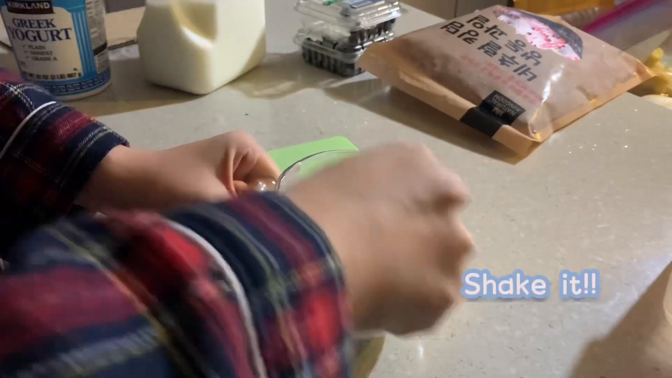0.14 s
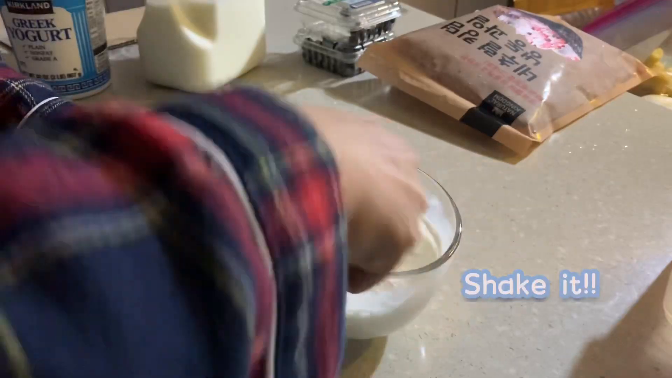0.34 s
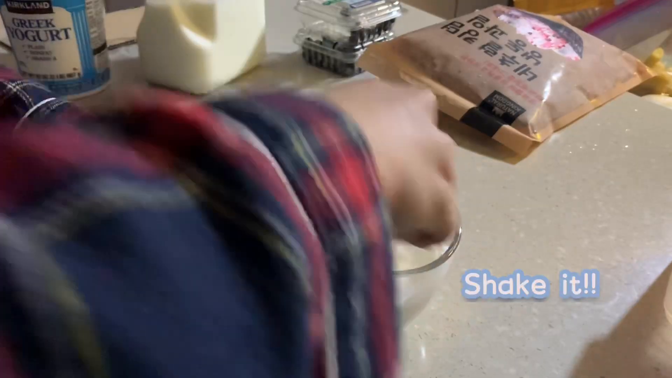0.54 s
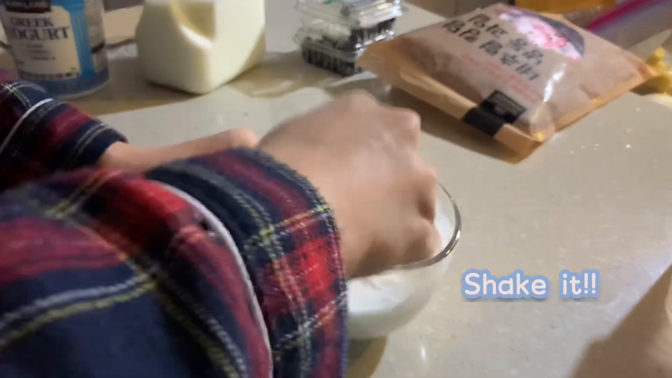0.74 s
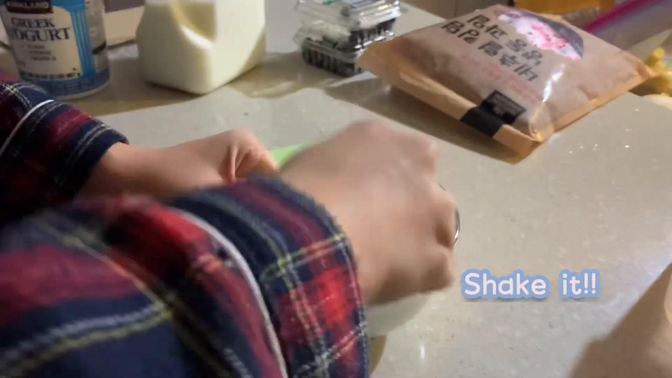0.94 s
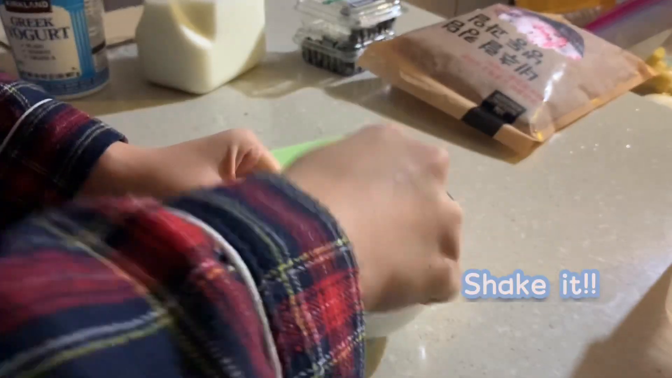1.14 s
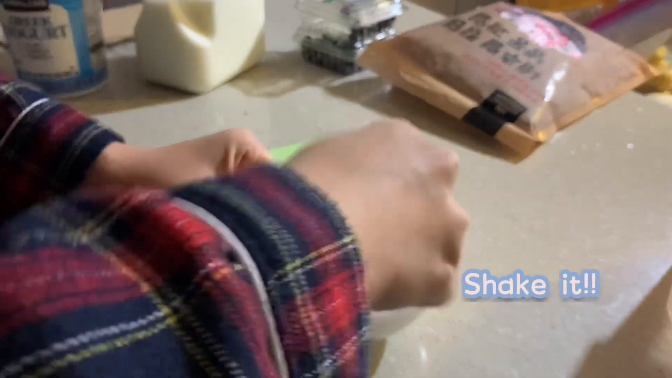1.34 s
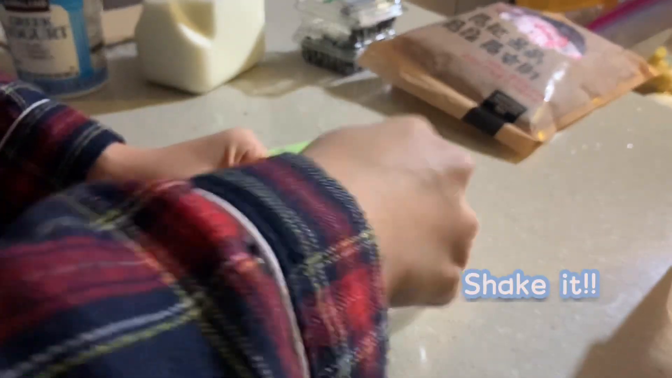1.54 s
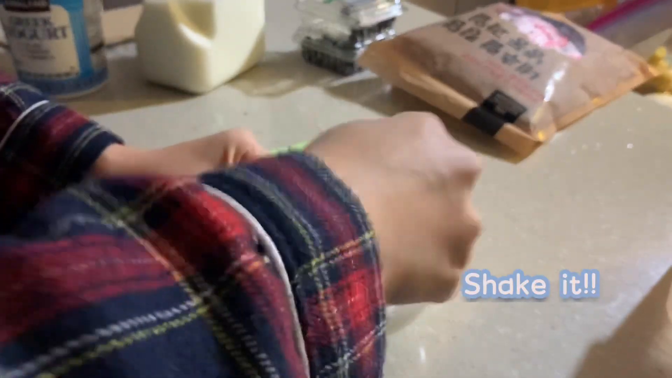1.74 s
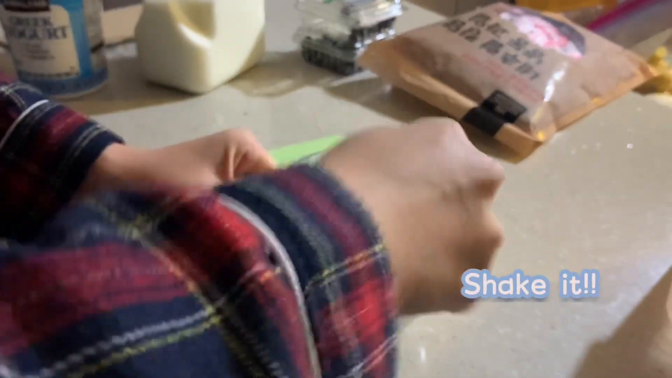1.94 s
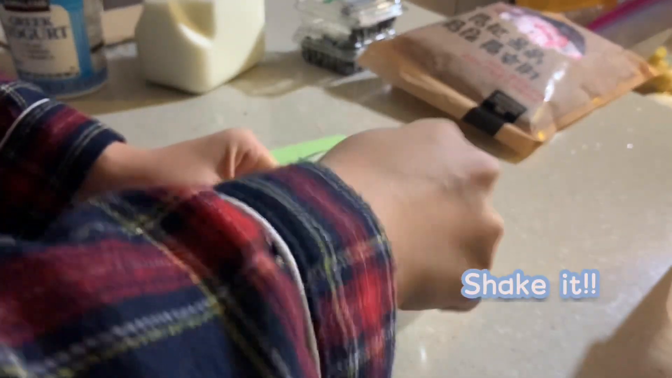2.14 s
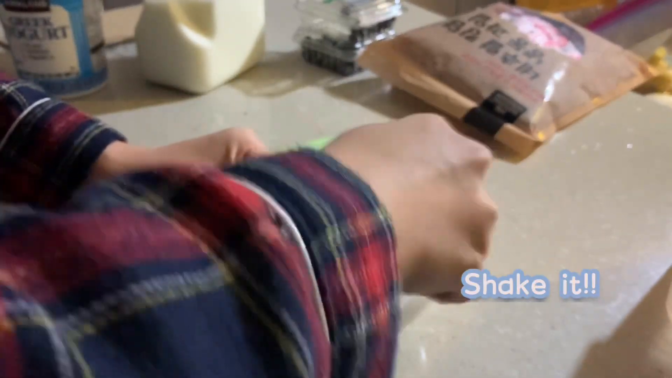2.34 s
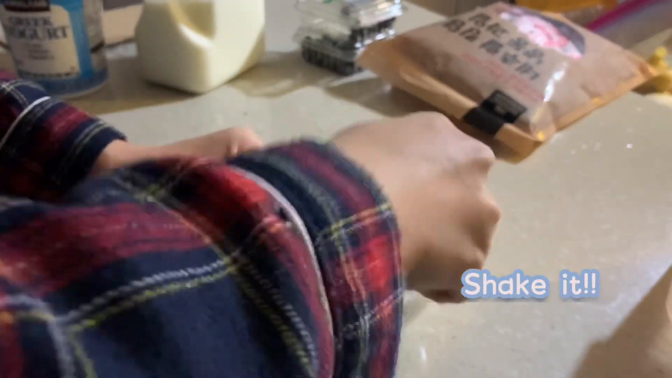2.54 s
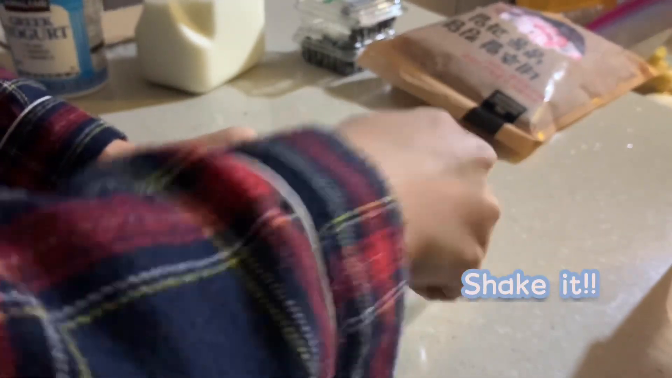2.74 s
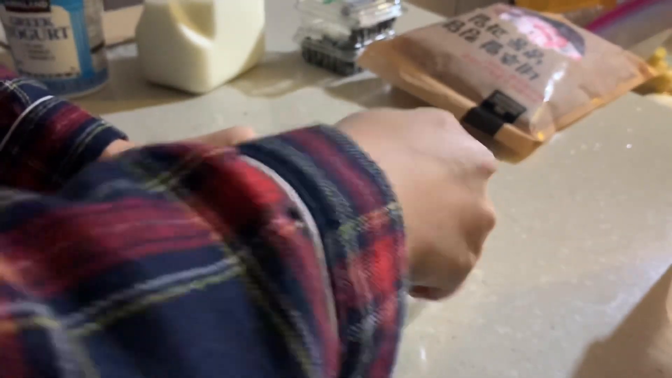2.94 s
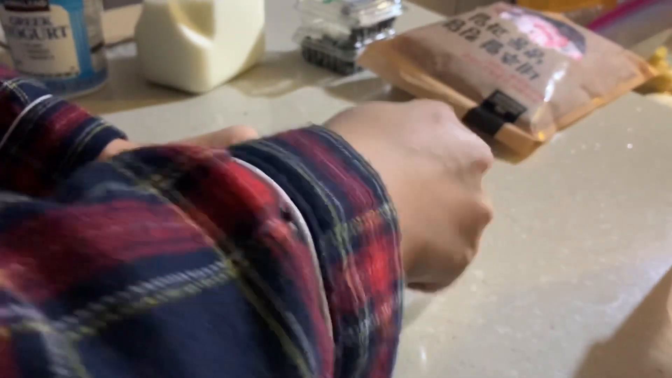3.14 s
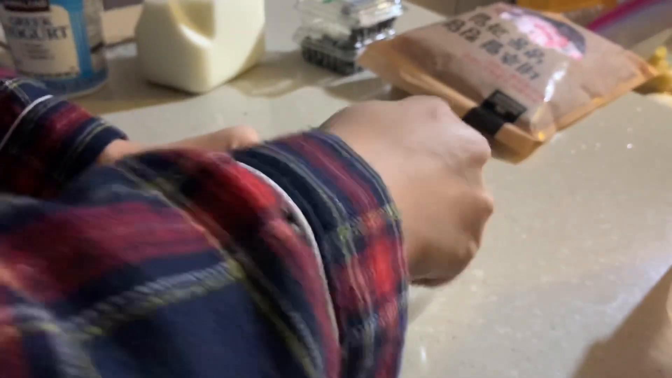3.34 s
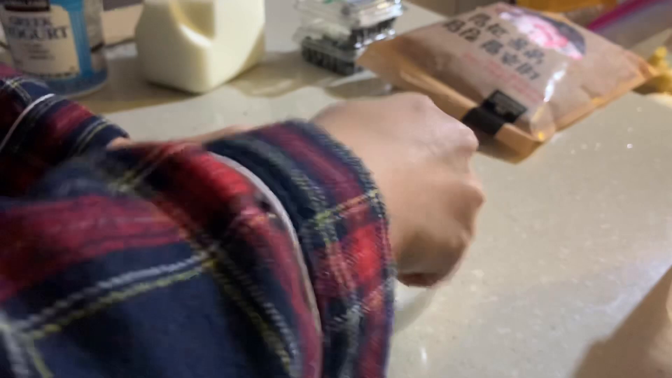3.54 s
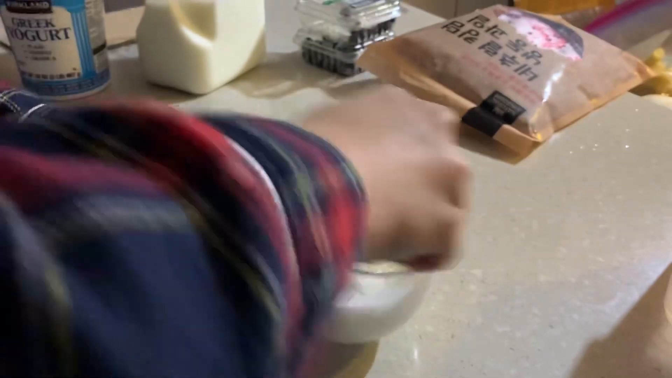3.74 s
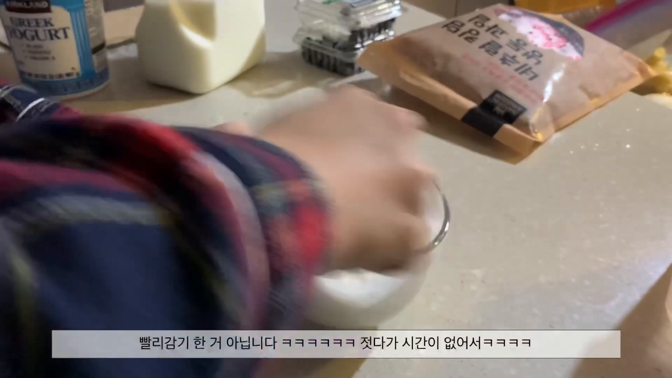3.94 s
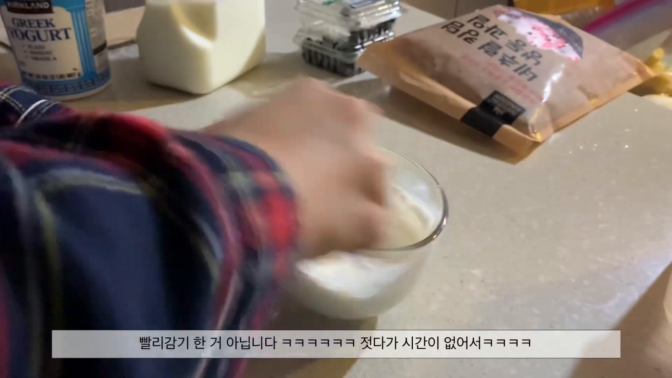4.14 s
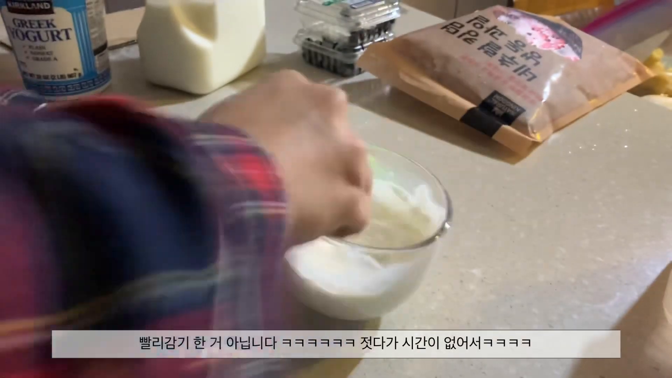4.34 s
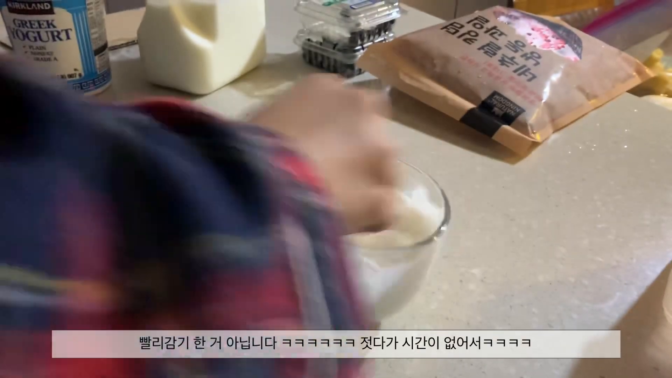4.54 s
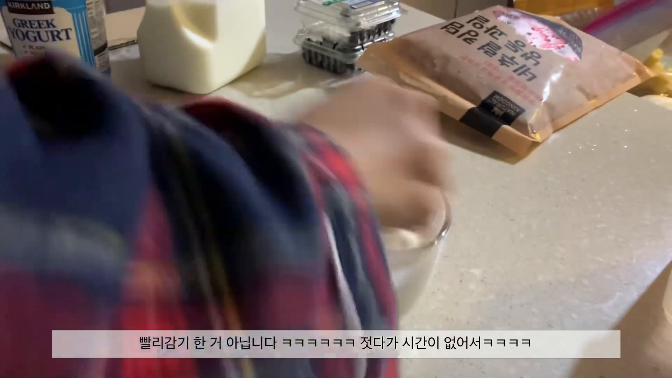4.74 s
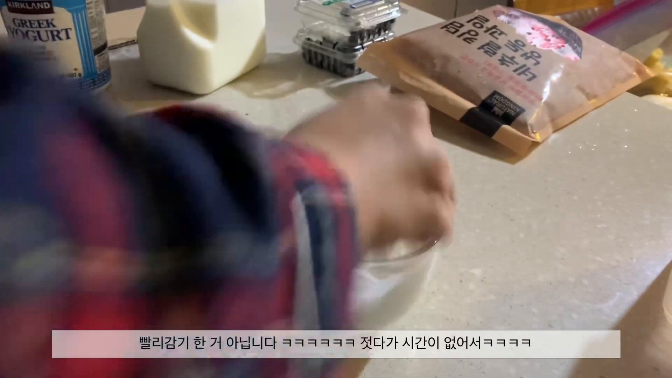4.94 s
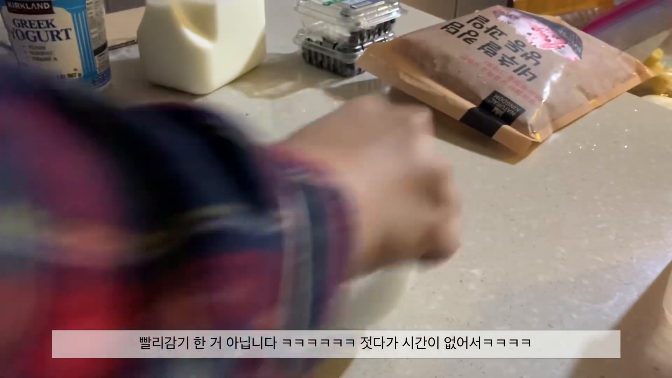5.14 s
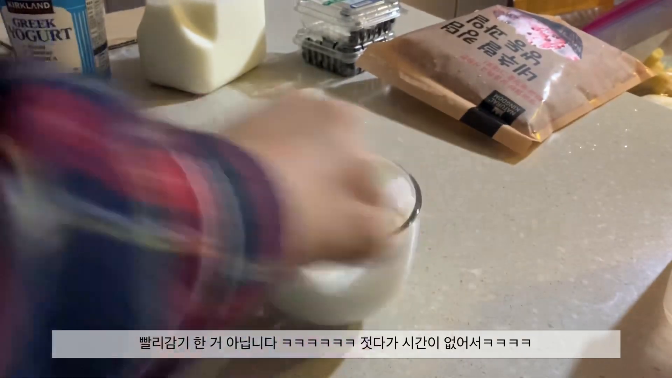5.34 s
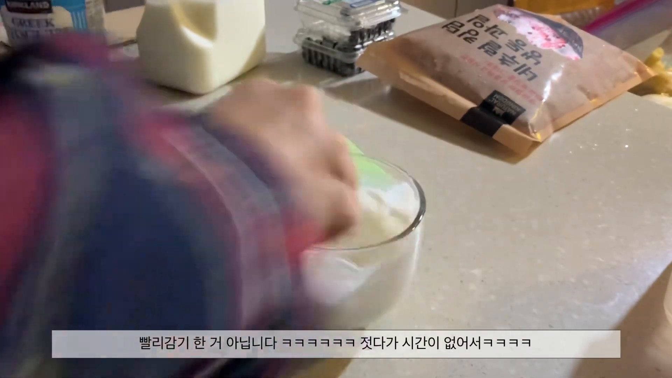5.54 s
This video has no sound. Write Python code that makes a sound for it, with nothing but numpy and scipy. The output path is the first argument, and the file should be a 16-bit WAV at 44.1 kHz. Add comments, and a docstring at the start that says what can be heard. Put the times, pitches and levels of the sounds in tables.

```python
"""Beating yogurt in a glass mug

A spoon beats thick yogurt and milk on a kitchen counter, about five turns a second. Each turn knocks
the wall of the mug, whose ring the filling damps to a short clink, and thumps the counter. Later the
spoon digs deeper and air pockets plop and squelch. A faint hum fills the small, echoing room."""
import sys
import numpy as np
from scipy import signal
from scipy.io import wavfile

SR = 44100
rng = np.random.default_rng(int(sys.argv[2]) if len(sys.argv) > 2 else 0)


def int16_out(signal):
    """Quantize to a 16-bit WAV file."""
    q = np.round(np.clip(np.atleast_2d(signal).T, -1, 1) * 32767)
    wavfile.write(sys.argv[1], SR, q.astype(np.int16))


N = 251370


def from_db(db):
    """Turn decibels into a gain."""
    return 10 ** (np.asarray(db) / 20)

def rms_one(x):
    """Scale to an average power of one."""
    return x / np.sqrt(np.mean(x ** 2) + 1e-20)

def peak_one(x):
    """Scale to a peak of one."""
    return x / np.abs(x).max()

def seconds(length):
    """The time of each sample."""
    return np.arange(int(length * SR)) / SR

def panned(db):
    """Left and right gains; positive is louder on the left."""
    return from_db(np.array([[.5], [-.5]]) * db)

def spaced(sound, lag_s):
    """The sound reaches the right side later than the left (earlier if negative)."""
    left, right = np.broadcast_to(sound, (2, sound.shape[-1]))
    i = np.arange(len(left))
    return np.array([np.interp(i - max(-lag_s, 0) * SR, i, left, left=0),
                     np.interp(i - max(lag_s, 0) * SR, i, right, left=0)])

def cut(x, hz, kind, order=2):
    """Keep the lows, the highs or a band."""
    sos = signal.butter(order, np.clip(hz, 10, .45 * SR), kind, fs=SR, output="sos")
    return signal.sosfilt(sos, x + 1e-18)

def add(track, s, sound):
    """Mix a sound in at s seconds."""
    i = max(round(s * SR), 0)
    track[:, i:i + sound.shape[-1]] += sound[..., :N - i]

def at_hz(table, hz, column=1):
    """Read a table between its listed frequencies."""
    table = np.array(table)
    return np.interp(np.log(hz), np.log(table[:, 0]), table[:, column])

def noise_bands(size, alike_hz):
    """Half-octave bands of stereo noise; the two sides agree in the bass."""
    edges = 22 * 2 ** np.arange(0, 10, .5)
    white = rng.standard_normal((2, 2, size))
    for k, (low, high) in enumerate(zip(edges, edges[1:])):
        hz = np.sqrt(low * high)
        mid, side = cut(white[k % 2], [low, high], "band")
        alike = 1 / (1 + (hz / alike_hz) ** 2)
        yield hz, np.sqrt((1 + alike) / 2) * mid + np.sqrt((1 - alike) / 2) * side * [[1], [-1]]

def depth(s, dig_s=3.612, ramp_s=0.13):
    """How deep the spoon works: 0 high on the wall, 1 at the bottom."""
    return np.clip((s - dig_s) / ramp_s, 0, 1)

# tone of the room's air: f/Hz, relative level/dB
AIR_TONE = [(18, -44), (30, 0.5), (75, -5.5), (154, -6), (240, -23), (1000, -32), (1270, -34.5),
            (1730, -50), (2490, -45), (7240, -57), (9390, -63.5), (15000, -60.5)]
def room_air(bands):
    """The air makes a soft rumble with a trace of hiss."""
    return from_db(-60.5) * rms_one(sum(from_db(at_hz(AIR_TONE, hz)) * band for hz, band in bands))

# tone of rustling flannel: f/Hz, relative level/dB
SLEEVE_TONE = [(100, -29.5), (2500, 0.5), (7000, -5), (9300, 0.5), (11700, -5), (14000, -5.5)]
def sleeve(bands):
    """The sleeve rustles with the arm, more once the spoon digs down."""
    rustle = rms_one(sum(from_db(at_hz(SLEEVE_TONE, hz)) * band[:, ::-1] for hz, band in bands))
    return from_db(-84 + 6 * depth(np.arange(N) / SR)) * rustle

def background(hum_hz=63.8):
    """Room air, the low hum of an appliance and the sleeve."""
    bands = list(noise_bands(N, alike_hz=613))
    hum = from_db(-56) * np.sqrt(2) * np.sin(2 * np.pi * hum_hz * np.arange(N) / SR)
    return panned(-3.3) * (room_air(bands) + hum) + sleeve(bands)

# the kitchen's lingering sound: f/Hz, level/dB, time to fade by 60 dB/s
ROOM_TAIL = [(58.3, -2.5, 0.98), (200, -8, 0.4), (356, 4.5, 0.17), (704, -2, 0.43), (1400, -8, 0.54),
             (2270, -4.5, 0.47), (4380, -5, 0.45), (8460, -9.5, 0.15), (15000, -25, 0.22)]
# bounces off nearby surfaces: delay/s, gain, side (0 left, 1 right)
NEAR_ECHOES = [(0.003263, 0.56, 0), (0.0098, 0.045, 0), (0.00305, 0.29, 1), (0.008, 0.38, 1)]
def kitchen_response():
    """Things on the counter bounce the sound back first; then a wash of echoes dies away."""
    t = seconds(.6)
    response = np.zeros((2, len(t)))
    for hz, band in noise_bands(len(t), alike_hz=316):
        decay = np.log(1000) / at_hz(ROOM_TAIL, hz, column=2)
        response += from_db(at_hz(ROOM_TAIL, hz)) * band * np.exp(-decay * t) * np.sqrt(2 * decay / SR)
    response *= (1 - np.exp(-(t / .005) ** 2)) * (1 + 1.6 * np.exp(-t / .008))  # quick early swell
    for delay, gain, side in NEAR_ECHOES:
        click = 1.0 * (t == t[round(delay * SR)])
        response[round(side) % 2] += gain * cut(click, 7000, "low")
    return response

def bubble(hz, cycles, rise):
    """An air pocket rings for some cycles while its pitch slides."""
    t = seconds(.1)
    life = np.minimum(t * hz / cycles, 2)
    return np.exp(-np.log(1000) * life) * np.sin(2 * np.pi * np.cumsum(hz * (1 + rise * life)) / SR)

# how loudly the filling churns: t/s, relative level/dB
CHURN_LEVELS = [(0.2, -88), (0.6, -89), (1.47, -70), (3.54, -67), (3.89, -57.5), (4.47, -59), (5.27, -45),
                (5.7, -52.5)]
def churn(count=1500):
    """Small soft bubbles are folded in all the time; the thick filling muffles the high ones."""
    out = np.zeros((2, N))
    for when, smallness, faintness in rng.random((count, 3)):
        pop = bubble(310 * 11 ** smallness, cycles=15, rise=0.21)
        add(out, when * N / SR, from_db(-14 * faintness - 3 * smallness) * pop)
    level_db = np.interp(np.arange(N) / SR, *np.transpose(CHURN_LEVELS)) - 2.5
    return rms_one(cut(out, 2400, "low")) * from_db(level_db)

def squelch(spread_s=0.015, low_hz=896, high_hz=8800, count=36):
    """A wet film tears into a swarm of tiny bubbles, the smaller ones fainter."""
    out = np.zeros(int(.3 * SR))
    for when, smallness, faintness in rng.random((count, 3)):
        hz = low_hz * (high_hz / low_hz) ** smallness
        pop = from_db(-4 * np.log2(hz / low_hz) - 10 * faintness) * bubble(hz, cycles=12.8, rise=0.22)
        i = int(spread_s * when ** 2 * SR)
        out[i:i + len(pop)] += pop * rng.choice([-1, 1])
    return cut(peak_one(out), 4000, "low")

# air pockets closing in the yogurt: t/s, relative level/dB, f/Hz
AIR_POCKETS = [(4.0, -35, 206), (4.235, -37.5, 247), (4.356, -29.5, 224), (4.571, -22, 239),
               (4.654, -29.5, 230), (4.807, -22.5, 238), (4.894, -31, 256), (5.016, -19.5, 211),
               (5.036, -19, 320), (5.17, -19, 300), (5.215, -13, 310), (5.224, -13.5, 426),
               (5.233, -17, 456), (5.238, -11, 230), (5.433, -19, 295), (5.455, -20, 426), (5.46, -15, 254),
               (5.602, -17.5, 308)]
def plops(usual_db=-21.5, usual_hz=263):
    """The hollow behind the spoon closes with a low gulp, and its film tears with a squelch."""
    out = np.zeros((2, N))
    for s, size_db, hz in AIR_POCKETS:
        # big pockets tear louder; shallow, high ones are wetter and gulp less
        octaves = np.log2(hz / usual_hz)
        gulp_db = size_db - 1 - 2 * octaves
        squelch_db = -32 + 0.79 * (size_db - usual_db) + 17.5 * octaves
        overtone = from_db(-7) * bubble(2.05 * hz, cycles=5.4, rise=0.035)
        gulp = peak_one(cut(bubble(hz, cycles=6.1, rise=-0.026) + overtone, 123, "high"))
        add(out, s - .002, panned(-0.29) * from_db(gulp_db) * spaced(gulp, lag_s=0.000043))
        add(out, s, from_db(squelch_db) * spaced(squelch(), lag_s=.00007))
    return out

def struck(tones, tune, scatter_db):
    """A blow rings all of an object's tones; their strengths vary with the spot hit."""
    t = seconds(.25)
    out = np.zeros((2, len(t)))
    for hz, db, fade_s, pan in tones:
        fade = from_db(db + scatter_db * rng.normal() - 60 * t / fade_s)
        out += panned(pan) * fade * np.sin(2 * np.pi * hz * tune * t)
    return out

# counter top: f/Hz before tuning, level/dB, fade time/s, left minus right/dB
COUNTER_TONES = [(65.8, 7, 0.08, -5), (142.8, -11, 0.21, 3.5), (219.3, -1, 0.037, 4.5),
                 (334, 4, 0.009, -14)]
def counter_thump():
    """A knock passes through the base of the mug and shakes the counter."""
    return cut(struck(COUNTER_TONES, tune=0.99, scatter_db=1.86), 450, "low", order=4)

def resonate(x, hz, width):
    """Let a sound ring in one band around hz."""
    r = np.exp(-np.pi * width / SR)
    feedback = [1, -2 * r * np.cos(2 * np.pi * hz / SR), r * r]
    return signal.lfilter(np.array([1, 0, -1]) * (1 - r * r) / 2, feedback, x)

def tick(bands, skid_s, grit):
    """The steel lands and skids briefly, which makes it ring in broad bands."""
    t = seconds(.25)
    force = grit * rng.standard_normal(len(t)) * np.exp(-t / skid_s)
    force[0] += 1  # the landing
    steel = sum((-1) ** k * from_db(db) * resonate(force + 1e-18, hz, width)
                for k, (hz, width, db) in enumerate(bands))
    return peak_one(cut(steel, 1.14 * bands[0][0], "high"))

# steel spoon damped by the fingers: f/Hz, width/Hz, level/dB
STEEL_BANDS = [(3024, 970, 0.5), (3810, 490, 4.5), (4350, 437, 1.5), (6440, 980, -9.5)]
# sharp edge of the spoon's bowl: f/Hz, width/Hz, level/dB
TIP_BANDS = [(8380, 1200, -2), (10600, 910, -16.5), (14300, 770, -20.5)]
# spoon handle: f/Hz, level/dB, fade time/s, left minus right/dB
HANDLE_TONES = [(4026, 4, 0.15, -2.5), (4330, -7, 0.16, -1), (4710, -2.5, 0.17, 2)]
def spoon(force_db, bright_db):
    """The spoon ticks on the right; its handle rings on when it lands on its edge."""
    steel = from_db(-31.5 + force_db + bright_db) * tick(STEEL_BANDS, skid_s=0.0048, grit=0.12)
    tip = from_db(-46.5 + 2.37 * force_db + 0.6 * bright_db) * tick(TIP_BANDS, skid_s=0.0018, grit=0.3)
    handle = from_db(-58 + force_db + 1.1 * bright_db) * struck(HANDLE_TONES, tune=1, scatter_db=3.5)
    return spaced(steel, lag_s=-0.000059) + spaced(tip, lag_s=-0.00013) + handle

def wall_pitch(s, clean_hz=1375, cling_hz=127, start_s=0.54, loosen_s=0.85):
    """The ring of the wall climbs and settles as the clinging yogurt comes loose."""
    return clean_hz - cling_hz * np.exp(-max(s - start_s, 0) / loosen_s)

# glass wall: f/Hz before tuning, level/dB, fade time/s, left minus right/dB
GLASS_TONES = [(912, -26.5, 0.025, 11), (1110, -28, 0.056, -23.5), (1270, -5, 0.039, 11),
               (1370, 13.5, 0.028, 1), (1485, 0.5, 0.029, 10.5), (1996, -9, 0.012, -2),
               (2460, -10.5, 0.017, 5), (2651, -18.5, 0.02, -34)]
def clink(force_db, bright_db, hz):
    """Spoon meets glass, a little to the left; a brighter hit wakes the wall's upper tones."""
    upper_db = 9.5 + 0.88 * bright_db
    tones = [(f, db + upper_db * (f > 1800), fade_s, pan) for f, db, fade_s, pan in GLASS_TONES]
    ring = struck(tones, tune=hz / 1340, scatter_db=3.5)
    ring = cut(ring, 997, "high", order=4)  # glass gives off little below its lowest tone
    ring = peak_one(cut(ring, 2546, "low", order=6))
    glass = from_db(-14.5 + force_db) * panned(0.9) * spaced(ring, lag_s=.00009)
    return glass + spoon(force_db, bright_db)

# hits of the spoon on the mug: t/s, relative level/dB, brightness (steel over glass)/dB
SPOON_HITS = [(0.0732, -32, -20), (0.5288, -50.5, -54), (0.6452, -62, -31), (0.8252, -14, -34.5),
              (1.041, -13, -37), (1.232, -12, -32), (1.4153, -11, -30), (1.5872, -14, -32.5),
              (1.6272, -23.5, -36), (1.7578, -14.5, -30.5), (1.8011, -19.5, -32), (1.9362, -20, -29.5),
              (2.108, -18, -30), (2.2779, -15, -32), (2.4635, -14.5, -30), (2.6446, -14.5, -30),
              (2.8243, -16, -28), (3.0119, -20, -20.5), (3.207, -18, -21.5), (3.4157, -18.5, -30),
              (3.4858, -32.5, -44), (3.7099, -27, -36), (3.7445, -33.5, -22.5), (3.9385, -26, -37.5),
              (4.1515, -19.5, -31.5), (4.241, -30.5, -33.5), (4.3851, -14, -30), (4.6102, -25.5, -33),
              (4.6637, -40.5, -20.5), (4.8531, -21, -35), (4.9107, -27.5, -29), (5.0863, -19.5, -26),
              (5.1313, -28, -22.5), (5.3423, -17.5, -26), (5.5746, -26, -31)]
def knocks(usual_db=-17, usual_bright_db=-25.5):
    """Each hit clinks the mug and thumps the counter; the thumps grow once the spoon digs down."""
    out = np.zeros((2, N))
    for s, level_db, bright_db in SPOON_HITS:
        force_db = level_db - usual_db
        add(out, s, clink(force_db, bright_db - usual_bright_db, wall_pitch(s)))
        thump_db = -37 + 0.45 * force_db + 7.5 * depth(s)
        thump_db = min(thump_db, level_db - 2.5)  # a light touch cannot shake the counter much
        add(out, s, from_db(thump_db) * counter_thump())
    return out

def scene():
    """Mug and filling sound into the kitchen, which still rings from a knock just before."""
    mug = knocks() + plops() + churn()
    room = kitchen_response()
    out = mug + signal.fftconvolve(mug[:1], room, axes=1)[:, :N]
    earlier_knock = signal.fftconvolve(clink(force_db=-0.5, bright_db=1.5, hz=1380), room, axes=1)
    add(out, 0, earlier_knock[:, int(.04 * SR):])
    return out + background()

def record(dry):
    """The microphone chain delays the bass, so each thump sweeps downward; rumble and top are cut."""
    lag_hz, stages = 100, 12
    pole = np.exp(-2 * np.pi * lag_hz / SR)
    bass_delay = [[pole, -1, 0, 1, -pole, 0]] * stages
    swept = signal.sosfilt(bass_delay, cut(dry, 51.6, "high", order=4))
    return cut(swept, 15800, "low", order=16)


dry = scene()
out = record(dry)
int16_out(out)
```